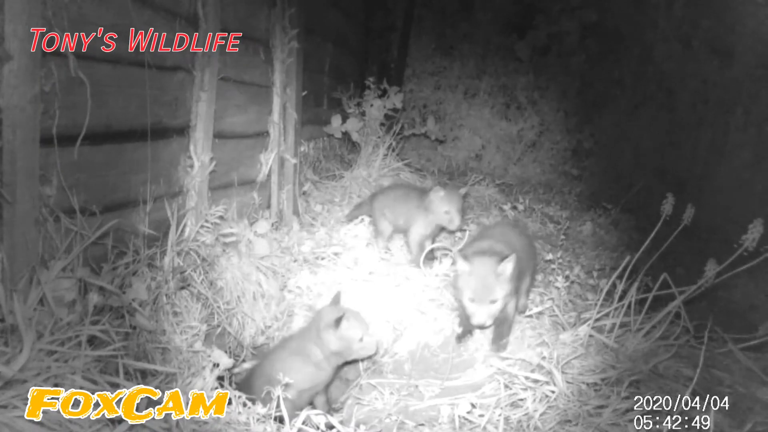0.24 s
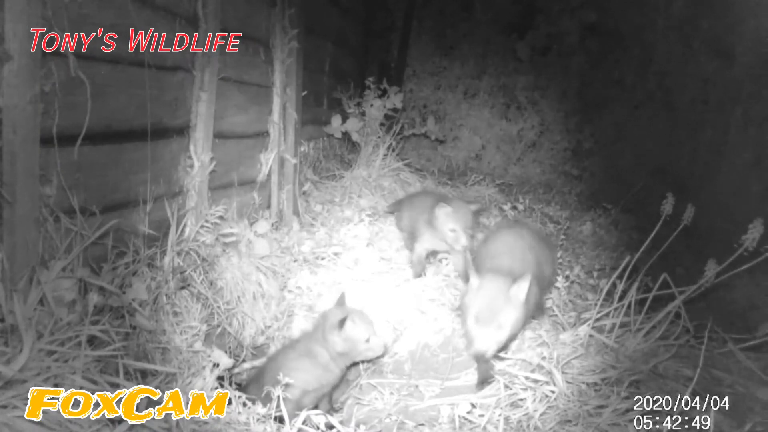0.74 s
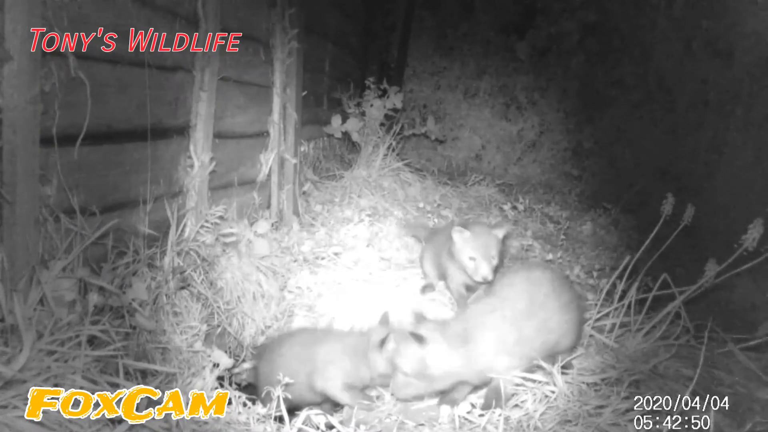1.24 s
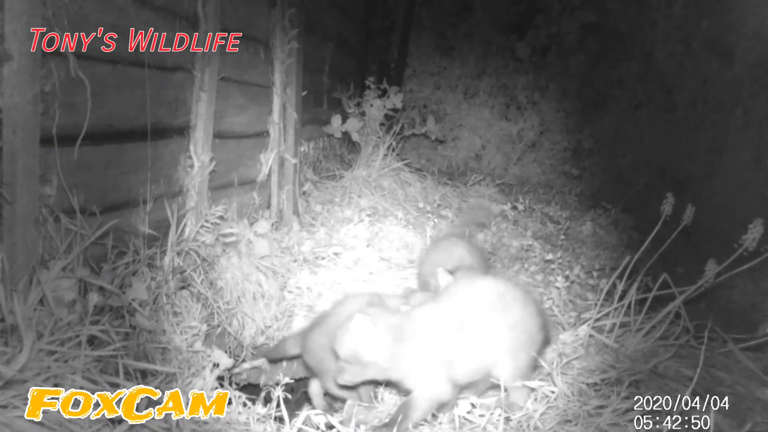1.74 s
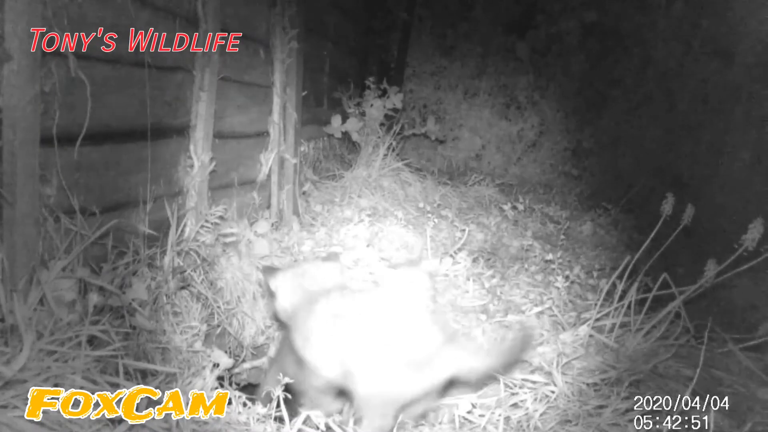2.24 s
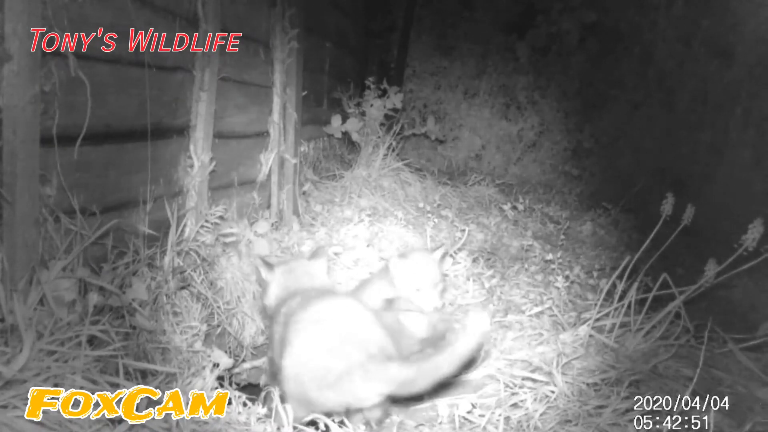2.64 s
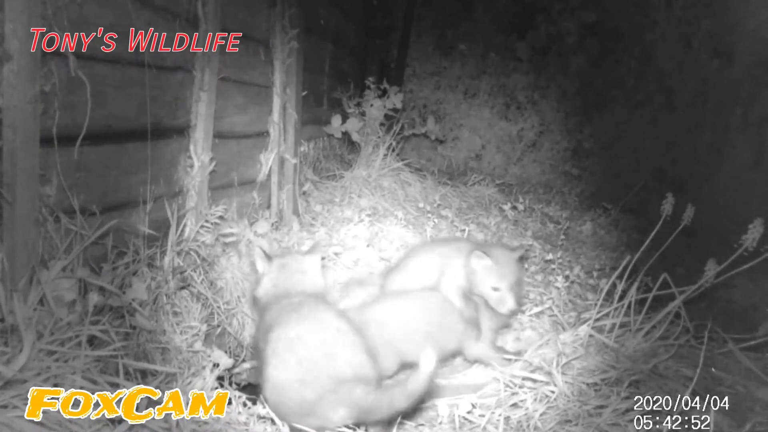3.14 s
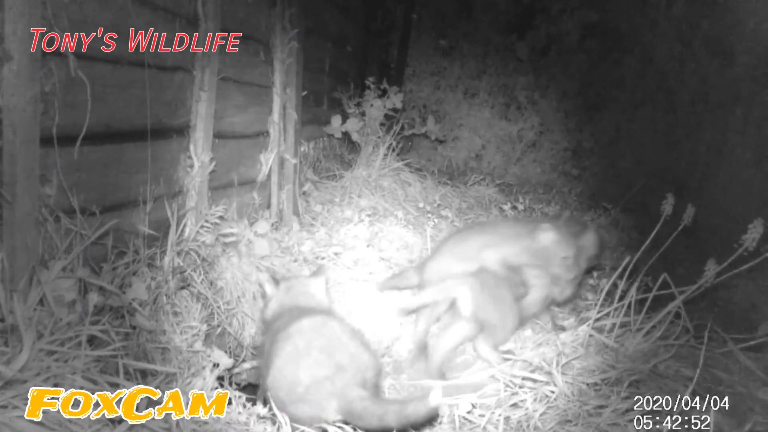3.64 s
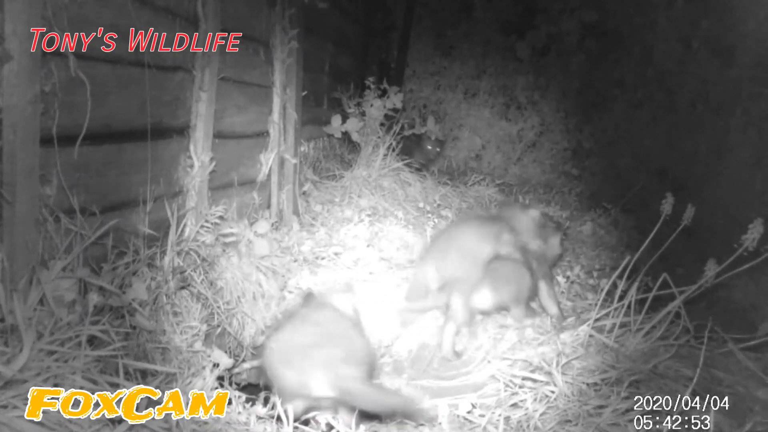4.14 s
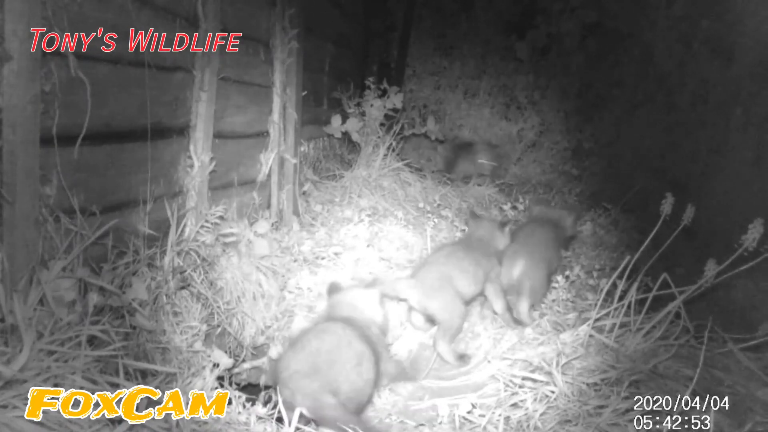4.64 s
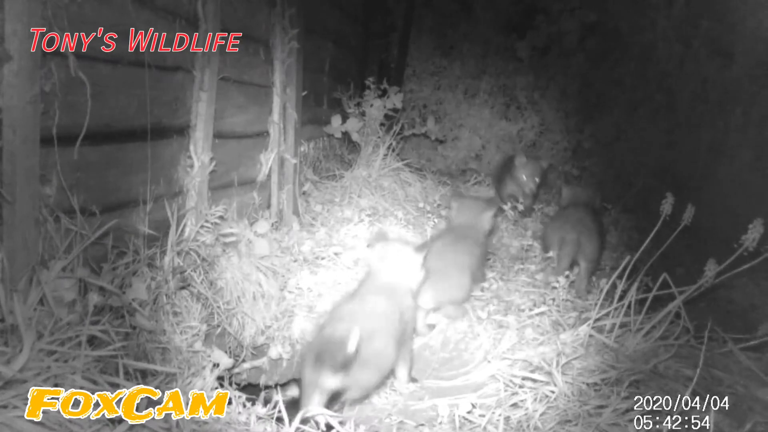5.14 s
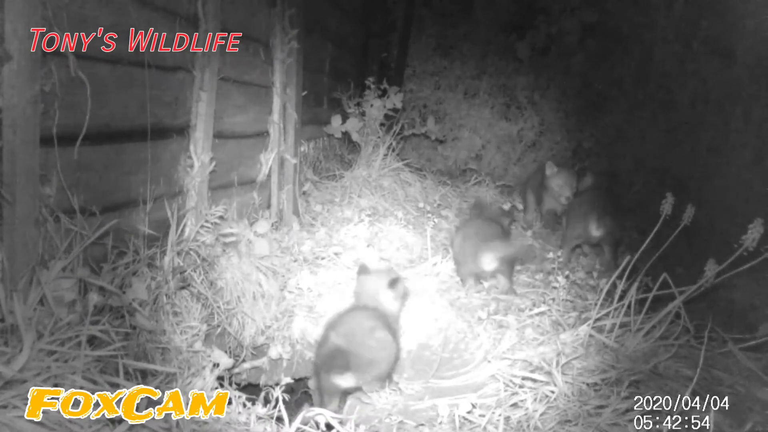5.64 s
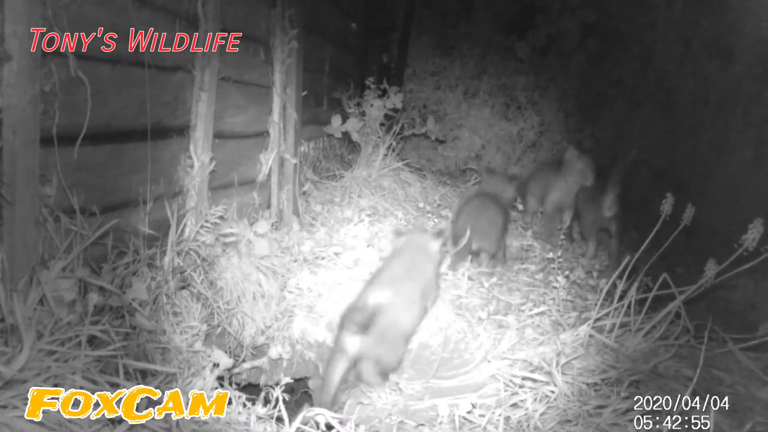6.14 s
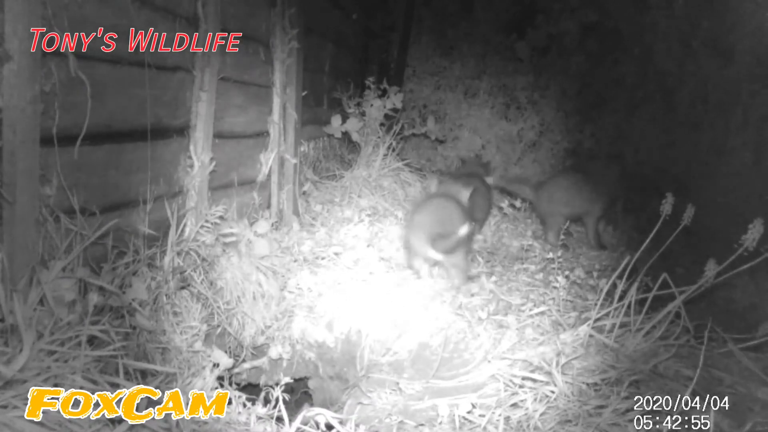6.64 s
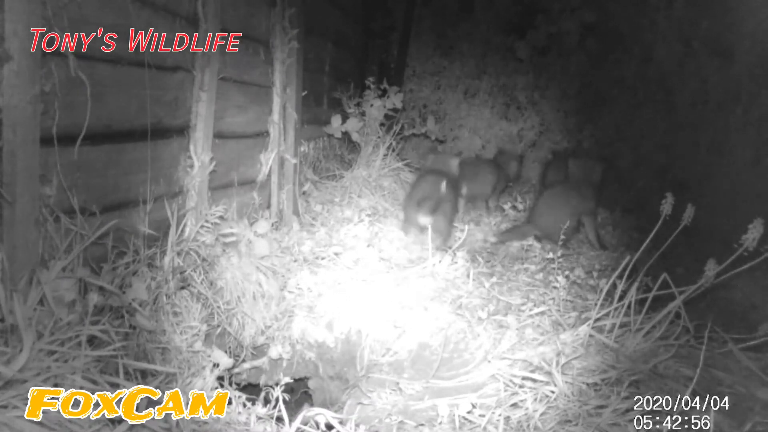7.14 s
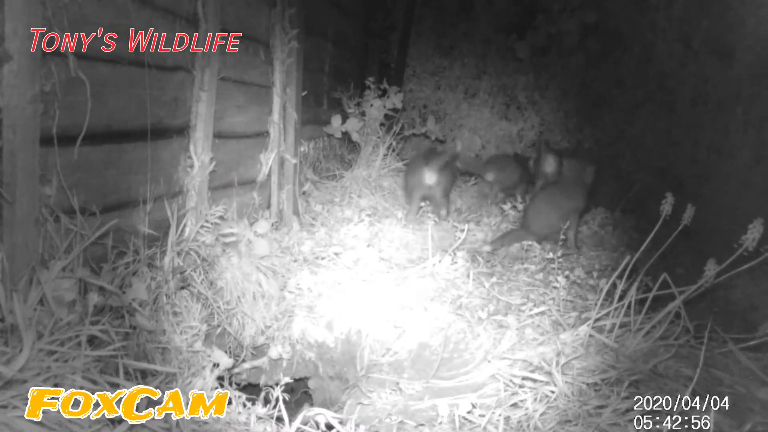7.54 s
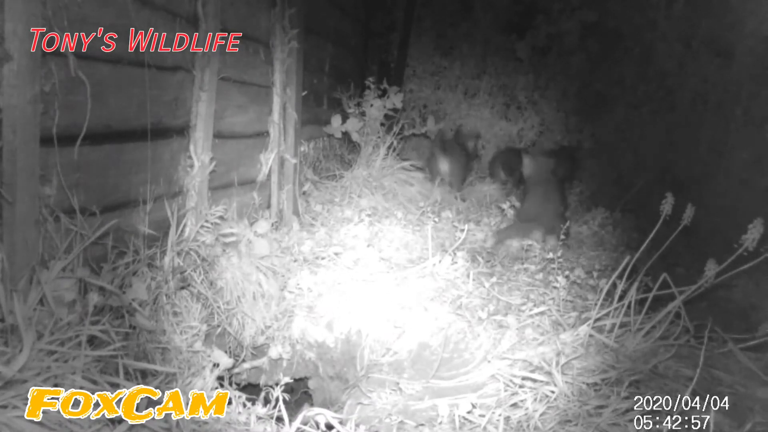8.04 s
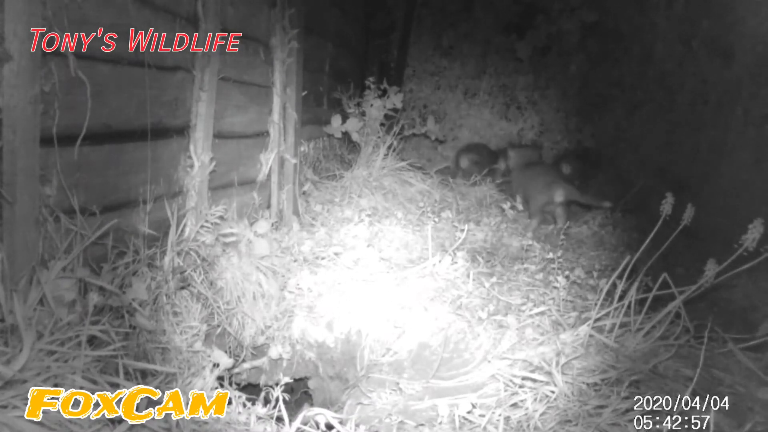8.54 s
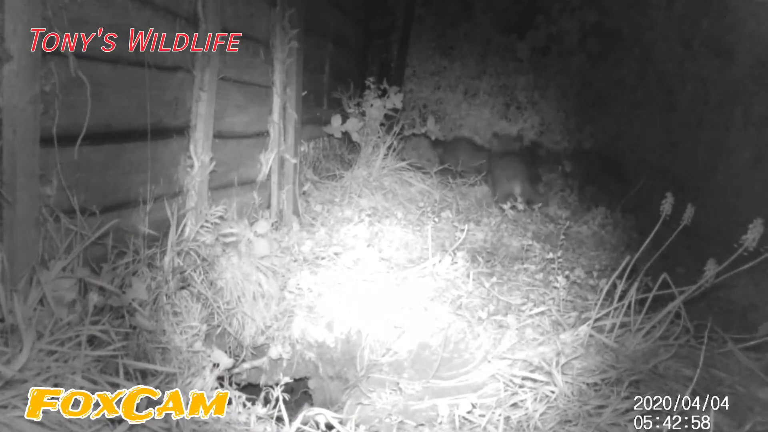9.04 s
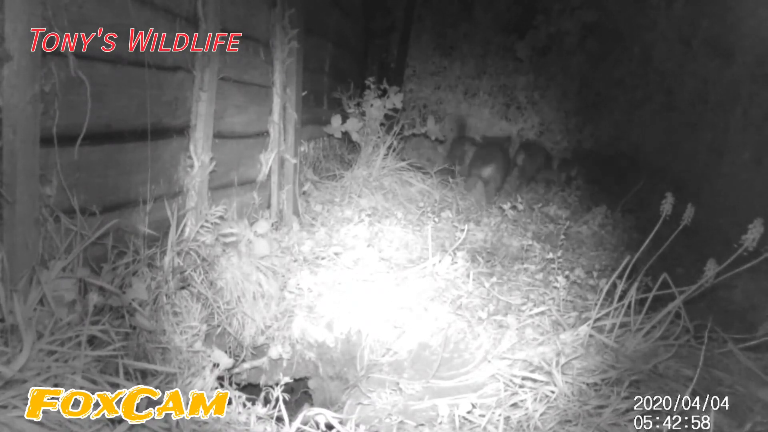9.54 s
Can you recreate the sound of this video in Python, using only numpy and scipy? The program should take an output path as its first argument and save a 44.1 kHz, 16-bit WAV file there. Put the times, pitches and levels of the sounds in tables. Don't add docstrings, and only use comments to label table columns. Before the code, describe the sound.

Garden dawn chorus: faint distant birdsong and a trill, then a songbird very close whistling loud, quick phrases over low town rumble.

```python
import sys
import numpy as np
from scipy import signal
from scipy.fft import rfft, irfft, next_fast_len
from scipy.io import wavfile
from scipy.ndimage import uniform_filter1d, minimum_filter1d, map_coordinates

SR = 44100
rng = np.random.default_rng(int(sys.argv[2]) if len(sys.argv) > 2 else 0)


def unload_audio(sound):
    columns = np.transpose(np.atleast_2d(sound))
    steps = np.round(np.clip(columns, -1, 1) * 32767)
    wavfile.write(sys.argv[1], SR, steps.astype(np.int16))


def volts_from_decibels(level):
    exponent = np.asarray(level, float) / 20
    return 10 ** exponent


N = 431738


def along(points, hz):
    f, v = np.transpose(points)
    return np.interp(np.log(hz + 1), np.log(f + 1), v)


def unit(x):
    return x / np.sqrt(np.mean(x ** 2) + 1e-20)


def filtered(x, response):
    m = next_fast_len(N + SR // 2)
    return irfft(rfft(x, m) * response(np.fft.rfftfreq(m, 1 / SR)), m)[:N]


def wobble(knots_per_s):
    knots = rng.standard_normal(int(N * knots_per_s / SR) + 4)
    coarse = np.arange(0, N + 16, 16)
    return np.interp(np.arange(N), coarse, map_coordinates(knots, [coarse * knots_per_s / SR]))


def whistle(notes, fade_s, flutter_db, flutter_hz, shake_hz):
    out = np.zeros(N + SR)
    shake = shake_hz * np.pad(wobble(flutter_hz), (0, SR))
    for note in notes:
        s, hz, db = np.transpose(note)
        t = np.arange(s[0] - fade_s, s[-1] + fade_s, 1 / SR)
        at = max(round(t[0] * SR), 0)
        ends = np.clip(np.minimum(t - t[0], t[-1] - t) / fade_s, 0, 1) ** 2
        pitch = uniform_filter1d(np.interp(t, s, hz), round(2 * fade_s * SR), mode="nearest")
        pitch = pitch + shake[at:at + len(t)]
        tone = np.sin(2 * np.pi * (np.cumsum(pitch) / SR + rng.random()))
        out[at:at + len(t)] += np.sqrt(2) * volts_from_decibels(np.interp(t, s, db)) * ends * tone
    return out[:N] * volts_from_decibels(flutter_db * wobble(flutter_hz))


# share of length, share of the way from first to second pitch, level/dB
SWOOP = [(0, 0.02, -14), (.25, .68, -1), (.55, .93, -2), (1, 1, -4.5)]
BOW = [(0, 0.088, -6), (.22, .72, -1.5), (.45, 1, -0.5), (.72, .7, -1.5), (1, .08, -8.5)]
SLIDE = [(0, 0.0021, -1.5), (.3, .3, -1), (.7, .7, 0), (1, 0.96, -4)]
FADE = [(0, 0.029, -8), (.12, .12, 0), (.55, .55, -6.5), (1, 1, -10)]
SWELL = [(0, 0, -13), (.6, .6, 0), (1, 1, -6.5)]


def sung(shape, notes):
    return [[(s + u * length, a_hz + way * (b_hz - a_hz), db + d) for u, way, d in shape]
            for s, length, a_hz, b_hz, db in notes]


def syllables(shape, song, slowing):
    return [[(s + (1 + slowing * k) * u, hz, db + d) for u, hz, d in shape]
            for k, (s, db) in enumerate(song)]


def bent(x):
    return x ** 3 / (np.abs(uniform_filter1d(x * x, 400)) + 2e-3)


def echoes(x, early_db, early_t60_s, late_db, late_t60_s):
    t = np.arange(SR) / SR
    out = x.copy()
    turn = np.pi * np.arange(N) / SR * 1.7
    for share in (np.cos(turn), np.sin(turn)):
        early = volts_from_decibels(early_db) * unit(volts_from_decibels(-60 * t / early_t60_s) * rng.standard_normal(SR))
        late = np.tanh(t / 0.012) * volts_from_decibels(-60 * t / late_t60_s) * rng.standard_normal(SR)
        late = volts_from_decibels(late_db) * unit(late)
        tail = (early + late)[:SR * 3 // 5] / np.sqrt(SR)
        out += signal.oaconvolve(x * share, tail)[:N]
    return out


# t/s, length/s, first f/Hz, second f/Hz, level/dB
NEAR_SWOOPS = [(6.629, 0.016, 3710, 4270, -14), (7.091, 0.026, 3380, 4240, -14.5),
               (7.308, 0.013, 3640, 4230, -13.5), (7.312, .011, 2683, 3050, -17),
               (7.427, 0.014, 3770, 4270, -16.5), (7.434, 0.011, 2772, 3200, -17),
               (7.534, 0.11, 3240, 3700, -28), (6.618, .01, 3700, 3850, -24)]
NEAR_BOWS = [
    (6.627, .014, 3700, 3590, -7.5),
    (6.65, .036, 4200, 4437, -16.5),
    (7.517, 0.016, 2980, 3087, -15),
]
NEAR_SLIDES = [(5.61, .155, 3800, 3660, -27), (6.44, .18, 3360, 3310, -35.5),
               (6.665, .017, 3383, 3860, -13), (6.682, .021, 3860, 3660, -6), (6.747, .09, 3374, 3680, -12),
               (6.722, .014, 3870, 3500, -5.5), (7.11, .018, 2880, 3410, -15),
               (7.146, .014, 3905, 4210, -16.5), (7.545, .175, 3990, 4200, -26.5),
               (7.731, 0.051, 4250, 4170, -28.5), (6.225, .015, 3380, 3250, -27),
               (6.43, .012, 3350, 3230, -32), (6.25, .04, 3350, 3400, -36), (6.77, .035, 2750, 3050, -36),
               (5.295, .006, 3600, 3450, -22)]
NEAR_FADES = [(5.28, .007, 3620, 3400, -11), (5.577, .008, 3650, 3480, -13), (5.388, .005, 4300, 3900, -10),
              (5.486, .008, 4200, 4090, -14), (7.197, .006, 4500, 4800, -30),
              (6.644, .022, 3720, 3340, -9.5), (6.75, .068, 4220, 3890, -8.5),
              (7.124, .022, 3470, 4170, -6), (7.14, .02, 3504, 3704, -7)]
# t/s, length/s, first f/Hz, second f/Hz, level/dB
NEAR_RASPS = [
    (6.845, .06, 3850, 3830, -23),
    (6.84, .07, 3300, 3200, -28),
    (6.92, .108, 3230, 3030, -27),
    (6.912, .115, 3800, 3640, -28.5),
    (6.85, .17, 4500, 4330, -42),
    (7.035, .035, 3750, 3600, -37),
]
# t/s, f/Hz, level/dB
LEAD_FALLING = [
    [(5.202, 5459, -40), (5.21, 5238, -23), (5.22, 5031, -23), (5.228, 4419, -36), (5.232, 4091, -18),
     (5.24, 4124, -12), (5.246, 4029, -13), (5.266, 4015, -20)],
    [(5.269, 4125, -22), (5.273, 4090, -19), (5.277, 3859, -25), (5.281, 3553, -14), (5.287, 3384, -13),
     (5.293, 3311, -23)],
    [(5.345, 4763, -25), (5.355, 4678, -9), (5.365, 4505, -7), (5.383, 4660, -10), (5.388, 4507, -17)],
    [(5.389, 3945, -17), (5.401, 3590, -7), (5.421, 3360, -7), (5.432, 3248, -18)],
    [(5.481, 4386, -24), (5.489, 4097, -9), (5.501, 4085, -7), (5.525, 3936, -15), (5.545, 3868, -12),
     (5.553, 3836, -21)],
    [(5.568, 3948, -24), (5.572, 3887, -27), (5.58, 3552, -13), (5.586, 3464, -13), (5.596, 3547, -15),
     (5.602, 3635, -28)],
]
LEAD_HELD = [
    [(6.036, 3462, -34), (6.046, 3423, -22), (6.07, 3392, -22), (6.086, 3381, -30), (6.126, 3393, -20),
     (6.144, 3417, -23), (6.17, 3396, -20), (6.194, 3403, -25), (6.205, 3365, -33)],
    [(6.298, 3492, -33), (6.31, 3443, -20), (6.328, 3400, -22), (6.382, 3428, -21), (6.416, 3390, -26),
     (6.424, 3308, -34), (6.43, 3321, -32)],
]
LEAD_RISING = [
    [(7.2, 3084, -24), (7.204, 3104, -19), (7.214, 3447, -5), (7.222, 3506, -6), (7.238, 3356, -6),
     (7.246, 3320, -16), (7.257, 3084, -33)],
    [(7.322, 3300, -21), (7.33, 3531, -8), (7.344, 3778, -14), (7.368, 3737, -10), (7.378, 3671, -17),
     (7.385, 3750, -25)],
    [(7.444, 3312, -21), (7.45, 3498, -9), (7.456, 3629, -9), (7.46, 3745, -20), (7.464, 4002, -12),
     (7.484, 4051, -6), (7.488, 4103, -10), (7.496, 4696, -20), (7.499, 4745, -27)],
]
# f/Hz, level/dB
BEAK = [(3000, -10), (3200, -8.5), (3340, -0.5), (4800, -1)]


def near_bird():
    quick = sung(SWOOP, NEAR_SWOOPS) + sung(BOW, NEAR_BOWS) + sung(FADE, NEAR_FADES)
    voices = whistle(quick, .0022, 2.5, 330, 35)
    voices = voices + whistle(sung(SLIDE, NEAR_RASPS), .004, 3.5, 260, 32)
    voices = voices + whistle(sung(SLIDE, NEAR_SLIDES), .0027, 1.3, 120, 13)
    voices = filtered(voices, lambda hz: volts_from_decibels(along(BEAK, hz)))
    side_tones = filtered(bent(voices), lambda hz: 1 / (1 + (4350 / (hz + 1)) ** 16))
    lead = whistle([*LEAD_FALLING, *LEAD_RISING], .0015, 1.3, 330, 22)
    lead = lead + whistle(LEAD_HELD, .003, .4, 120, 5)
    return echoes(voices + lead + volts_from_decibels(-15.5) * side_tones, -12, 0.07, -15.5, 0.65)


# t/s, length/s, first f/Hz, second f/Hz, level/dB
FLUTE_SWELLS = [(2.107, .18, 1770, 2027, -36), (2.164, 0.086, 2776, 2790, -40.5),
                (2.347, 0.12, 2620, 2100, -35), (2.58, .14, 2405, 2260, -32.5),
                (2.9, 0.087, 1760, 2190, -34.5), (7.33, .13, 2056, 1890, -41),
                (7.582, 0.085, 1885, 2030, -38), (7.76, .15, 1930, 2080, -33.5),
                (7.926, .08, 2460, 2136, -31), (8.279, 0.066, 2460, 2170, -28.5),
                (8.6, .36, 1900, 1944, -44), (8.959, .17, 1960, 2150, -45)]
FLUTE_SLIDES = [(9.52, .27, 2430, 2490, -41), (9.13, .12, 2350, 3000, -49), (7.56, .16, 2300, 2620, -45),
                (9.105, 0.075, 2200, 3150, -40.5), (9.18, .07, 3220, 3400, -40),
                (9.26, .045, 3440, 3480, -45), (9.0, .06, 2520, 2560, -39), (9.06, .05, 2500, 2250, -43),
                (2.5, .2, 1760, 1740, -45), (2.8, 0.12, 1894, 1870, -48), (2.97, 0.063, 2213, 2310, -30),
                (3.035, .1, 2298, 2187, -30), (3.135, .085, 2184, 1690, -38),
                (3.568, 0.17, 1910, 1980, -47), (8, .088, 2150, 1844, -33), (8.355, 0.088, 1816, 1600, -43)]
FLUTE_FADES = [
    (3.658, 0.11, 2330, 2233, -40),
    (7.462, 0.055, 1892, 1803, -35.5),
    (3.2, .2, 2150, 2050, -43),
    (8.35, .12, 2300, 2300, -45),
]


def flute_bird():
    song = sung(SWELL, FLUTE_SWELLS) + sung(SLIDE, FLUTE_SLIDES) + sung(FADE, FLUTE_FADES)
    return echoes(volts_from_decibels(-1) * whistle(song, .012, 2.2, 90, 30), -2.5, .14, -5, .55)


# t/s, length/s, first f/Hz, second f/Hz, level/dB
OPENING = [
    (1.63, .016, 4520, 5170, -27),
    (1.652, .02, 4530, 3970, -22.5),
    (1.672, .016, 3940, 4100, -33),
    (1.693, .007, 4570, 3700, -20),
    (1.716, .025, 4400, 3170, -27.5),
]
# t/s, length/s, first f/Hz, second f/Hz, level/dB
WARBLE = [(1.14, 0.022, 3030, 3300, -42), (1.169, .014, 3420, 3480, -38), (1.194, .009, 3470, 3500, -44),
          (1.231, 0.025, 3580, 3140, -39.5), (1.297, 0.017, 3350, 4830, -43),
          (1.324, 0.015, 3800, 3000, -43), (1.4, 0.011, 3200, 2930, -44), (1.428, 0.017, 3060, 3550, -45),
          (1.522, .009, 3480, 3470, -47)]
# t/s, length/s, first f/Hz, second f/Hz, level/dB
PLUNGE = [
    (3.421, .018, 5200, 2510, -34.5),
]
# t/s from its start, f/Hz, level/dB
HOOK = [(0, 4123, 0), (.01, 4630, -6), (.02, 4000, -2.5), (.035, 3450, -8), (.042, 3390, -45)]
ARCH = [(0, 3800, -4), (.014, 4800, 0.5), (.02, 4600, 1), (.033, 2400, -8.5)]
CHIP = [(0, 5530, -6), (.008, 4960, 3.5), (.016, 4400, 8), (.028, 3490, -14)]
WHIP = [(0, 2356, 1), (.008, 2710, 2), (.014, 4000, -1), (.022, 5560, -2)]
# t/s, level/dB
HOOKS = [(1.784, -24.5), (1.86, -25.5), (1.938, -25), (2.02, -25), (2.102, -25.5), (2.193, -30.5),
         (2.276, -30.5)]
ARCHES = [
    (3.474, -34.5),
    (3.546, -34.5),
    (3.628, -38.5),
]
CHIPS = [(9.324, -49), (9.366, -45.5), (9.409, -44.5), (9.45, -47), (9.496, -46), (9.535, -52)]
WHIPS = [
    (8.471, -44.5),
    (8.499, -42),
    (8.526, -38),
]


def trillers():
    hooks = sung(SLIDE, [*OPENING, *WARBLE]) + syllables(HOOK, HOOKS, .003)
    hooks = whistle(hooks, 0.0021, 3.0, 250, 50)
    deep = sung(SWELL, PLUNGE) + syllables(ARCH, ARCHES, 0.041)
    deep = deep + syllables(CHIP, CHIPS, 0.144) + syllables(WHIP, WHIPS, -.08)
    deep = whistle(deep, 0.0022, 3.0, 300, 140)
    return echoes(volts_from_decibels(-3) * hooks, -4.5, 0.07, -6.5, 0.55) + echoes(volts_from_decibels(-6.5) * deep, 6.5, .06, 1.5, .4)


# t/s, length/s, first f/Hz, second f/Hz, level/dB
HARSH = [(7.64, .077, 2100, 1900, -35), (3.1, .3, 3000, 2900, -48), (3.17, .08, 1800, 1500, -44),
         (9.33, 0.28, 4300, 4700, -48), (8.03, 0.13, 4300, 3900, -46), (3.94, .1, 3200, 3300, -45.5),
         (4.07, .06, 3800, 3700, -44), (4.14, .05, 4100, 4500, -46), (4.2, .08, 3700, 4200, -46),
         (3.83, .03, 4300, 3800, -46)]
BURRY = [(2.38, .17, 2200, 1780, -36), (2.39, .1, 2000, 1800, -40), (2.55, .08, 2400, 2300, -37),
         (2.56, .08, 2000, 2100, -41), (7.93, .15, 2500, 2050, -38), (8.34, .13, 1800, 1600, -43),
         (2.72, .12, 2350, 2250, -41), (9.15, .15, 1700, 1780, -47), (7.56, .24, 2450, 2600, -43.5),
         (9.51, 0.31, 2330, 2400, -41), (4.44, 0.072, 4000, 3800, -46), (.87, .044, 5450, 5450, -44.5)]


def buzzers():
    out = np.zeros(N + SR)
    shake = np.pad(wobble(knots_per_s=420), (0, SR))
    for notes, depth in ((HARSH, 0.095), (BURRY, 0.05)):
        for s, length, a_hz, b_hz, db in notes:
            k = round(s * SR) + np.arange(round(length * SR))
            hz = np.linspace(a_hz, b_hz, len(k)) * (1 + depth * shake[k])
            tone = np.sin(2 * np.pi * np.cumsum(hz) / SR)
            out[k] += volts_from_decibels(db) * signal.windows.tukey(len(k), .4) * tone
    return out[:N]


# t/s, length/s, first f/Hz, second f/Hz, level/dB
FAINT_NOTES = [(.35, .07, 4600, 4330, -47), (.42, .13, 4310, 4560, -45), (.535, .03, 4300, 3750, -50),
               (.676, .038, 4240, 4110, -48), (1.16, 0.042, 5460, 5130, -45.5),
               (2.586, 0.058, 3580, 3450, -48.5), (2.69, 0.06, 3570, 3700, -47),
               (2.848, 0.014, 3400, 3550, -40.5), (3.847, 0.043, 3700, 3320, -44),
               (8.213, .015, 3620, 4150, -48), (8.228, .05, 4150, 4280, -46),
               (8.584, 0.055, 4490, 4650, -40), (9.0, .055, 3880, 3900, -48), (9.06, 0.08, 4020, 4050, -45),
               (9.14, .07, 3950, 3700, -49), (7.97, .05, 3800, 4000, -45), (9.654, 0.063, 5050, 4680, -43),
               (9.675, .11, 3780, 3880, -46), (9.655, .022, 2870, 3770, -50),
               (.02, .11, 1900, 2530, -47), (.12, 0.11, 2600, 3350, -48.5), (1.9, 0.15, 2340, 2400, -46.5),
             (2.9, 0.11, 1520, 1550, -50), (3.91, 0.041, 2550, 2420, -43), (5.1, 0.15, 1923, 2035, -50.5),
             (5.95, 0.13, 2440, 2295, -50), (6.09, 0.083, 2104, 2150, -48), (7.12, 0.11, 1983, 2120, -46),
               (4.38, .075, 2690, 2700, -50), (4.53, .115, 2660, 2640, -49), (4.97, .065, 2180, 2230, -50),
        (.4, .08, 2900, 2850, -52), (.66, .03, 3050, 3000, -49), (.78, .16, 2020, 2200, -51),
        (2.61, .04, 4080, 4030, -45), (2.34, .045, 3850, 3820, -43), (2.97, .17, 4300, 4180, -50),
        (2.96, .17, 3850, 3750, -53), (2.79, .012, 3900, 3700, -42), (8.28, .03, 3120, 3100, -46),
        (9.32, .02, 2520, 2520, -45), (9.62, .035, 2800, 2800, -47), (3.76, .17, 2270, 2260, -50),
        (4.04, .17, 2000, 2150, -50), (8.6, .04, 4800, 4930, -47)]


def faint_birds():
    faint = whistle(sung(SLIDE, FAINT_NOTES), .006, 3, 110, 30)
    return echoes(volts_from_decibels(-2) * faint + volts_from_decibels(1.5) * buzzers(), -3, .08, -6.5, .4)


def crowd(count, centre_hz, spread, length_s):
    notes = []
    for start, p, q, glide, d in rng.random((count, 5)):
        s = start * N / SR
        hz = centre_hz * np.exp(spread * (p + q - 1))
        end_hz = hz * (1 + 0.26 * (glide - .5))
        notes.append([(s, hz, 7 * d), (s + length_s * (.3 + d), end_hz, 7 * d)])
    return unit(whistle(notes, .006, 2.7, 80, 60.4))


# t/s, low voices level/dB, high voices level/dB
BLUR = [(0, -54, -58), (1.2, -54, -52.5), (2.501, -43.5, -52), (4.1, -51, -49.5), (4.799, -54.5, -64.5),
        (6, -49.5, -54.5), (7.702, -49.5, -46), (8.7, -49, -66.5), (9.79, -45.5, -45.5)]


def blurred_chorus():
    t = np.arange(N) / SR
    s, low_db, high_db = np.transpose(BLUR)
    far = volts_from_decibels(np.interp(t, s, low_db)) * crowd(400, 2150, .27, .07)
    far += volts_from_decibels(np.interp(t, s, high_db)) * crowd(600, 4000, .27, .025)
    return echoes(volts_from_decibels(-10.5) * far, 6, .15, 4, .65)


# t/s, peak level/dB
TICKS = [(2.0736, -27), (2.885, -38), (2.893, -40), (3.1703, -37), (5.0633, -33.5), (5.1791, -42),
         (5.817, -30), (2.38, -38), (6.577, -34), (.782, -42), (9.11, -40), (4.72, -42)]


def straw():
    t = np.arange(N) / SR
    snaps = np.zeros(N)
    for s, db in TICKS:
        snaps[round(s * SR):][:200] += volts_from_decibels(db + 11 - 60 * t[:200] / 0.0087) * rng.standard_normal(200)
    r = rng.random((260, 2))
    cracks = np.bincount((r[:, 0] * N).astype(int), volts_from_decibels(-53 + 13 * r[:, 1] ** 2), N)
    snaps += np.convolve(cracks, rng.standard_normal(90) * volts_from_decibels(-60 * t[:90] / 0.0033))[:N]
    return filtered(snaps, lambda hz: 1 / (1 + (1800 / (hz + 1)) ** 4))


def engine():
    pipe_hz, pipe_wide_hz = 255, 22
    firing_hz = 38.6 + 1.1 * np.arange(N) / SR
    turn = 2 * np.pi * np.cumsum(firing_hz) / SR
    out = np.zeros(N)
    for k in (4, 5, 6, 7):
        detune = (k * firing_hz - pipe_hz) / pipe_wide_hz / 2
        out += np.sin(k * turn) / np.sqrt(1 + detune ** 2)
    return volts_from_decibels(-52.5) * out


# f/Hz, density/dB
TOWN = [(12, -41), (20, -5.5), (122, -2.5), (224, -9), (271, -9), (522, -14), (725, -9), (1030, -11.5),
        (1540, -19.5), (2140, -21), (3410, -25), (4630, -27.5), (5460, -27.5), (7100, -71.5), (12000, -120)]
# t/s, level/dB, extra rumble/dB
TOWN_DB = [
    (0, -44.5, 6),
    (2.998, -43.5, -2),
    (7.9, -44, 1),
    (9.79, -43, 2.5),
]


def town():
    t = np.arange(N) / SR
    s, town_db, low_db = np.transpose(TOWN_DB)
    hum = filtered(rng.standard_normal(N), lambda hz: volts_from_decibels(along(TOWN, hz)))
    hum /= np.std(filtered(hum, lambda hz: (hz > 300) & (hz < 1400)))
    rumble = unit(filtered(rng.standard_normal(N), lambda hz: np.exp(-((hz - 55) / 22) ** 2)))
    return volts_from_decibels(np.interp(t, s, town_db)) * (hum + volts_from_decibels(np.interp(t, s, low_db) - 4.0) * rumble)


def scene():
    birds = near_bird() + flute_bird() + trillers() + faint_birds()
    return (birds + blurred_chorus() + straw() + engine() + town())[None]


def slow_sampling(x):
    slow = 4
    x = filtered(x, lambda hz: 1 / (1 + (2 * slow * hz / SR) ** 40))
    x = x * (np.arange(N) % slow == 0) * slow
    image_db = [(4900, 1.5), (5500, -0.5), (5900, -15.0), (6300, -47.0), (6600, -100)]
    return filtered(x, lambda hz: volts_from_decibels(along(image_db, hz)))


# from t/s, to t/s, bend level/dB
SQUEEZE = [(5.363, 5.43, -32), (5.486, 5.55, -34), (5.57, 5.6, -35), (6.042, 6.2, -47), (6.683, 6.7, -32),
           (7.208, 7.252, -32), (7.31, 7.382, -33), (7.428, 7.5, -32), (7.512, 7.78, -47)]
# t/s, level/dB
CLICKS = [(7.098, -34.5), (7.103, -37.5), (7.225, -38), (5.365, -43), (2.103, -66), (9.787, -58),
          (6.69, -40)]


def limiter(x):
    t = np.arange(N) / SR
    room = minimum_filter1d(np.minimum(1, 1 / (np.abs(x) + 1e-6)), size=161)
    x = x * uniform_filter1d(room, size=81)
    bend = sum(volts_from_decibels(db) * ((t > a) & (t < b)) for a, b, db in SQUEEZE)
    x = x - uniform_filter1d(bend, size=200) * bent(x)
    for s, db in CLICKS:
        x[round(s * SR):][:7] += volts_from_decibels(db + 11.5) * np.hanning(7)
    return x


def top_cut(x):
    return signal.sosfilt(signal.butter(12, 15630, fs=SR, output="sos"), x)


def record(dry):
    x = limiter(slow_sampling(dry[0]))
    x = x - .0039 + volts_from_decibels(-89.0) * rng.standard_normal(N)
    return top_cut(x[None])


dry = scene()
out = record(dry)
unload_audio(out)
```